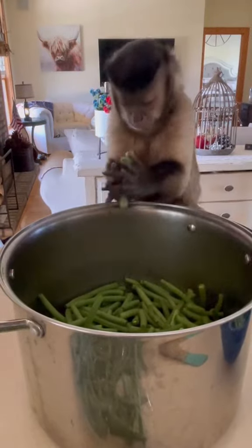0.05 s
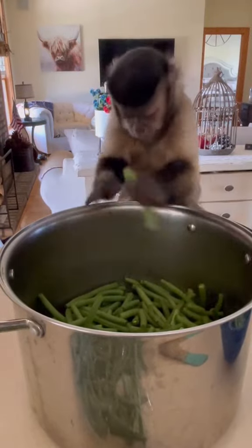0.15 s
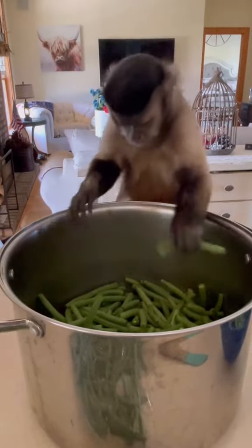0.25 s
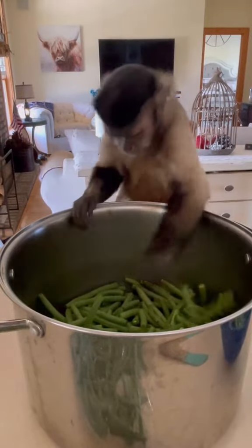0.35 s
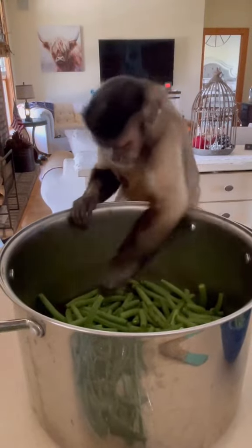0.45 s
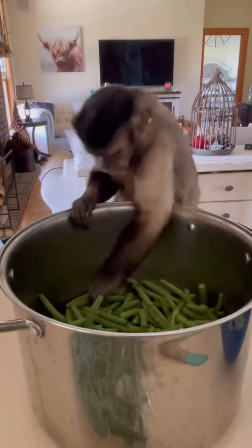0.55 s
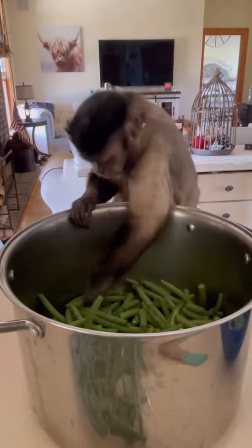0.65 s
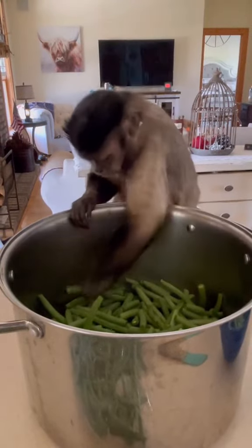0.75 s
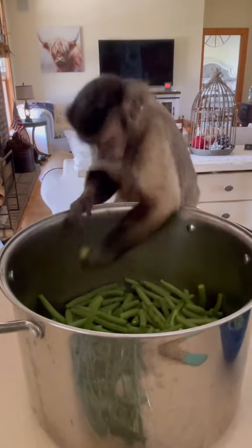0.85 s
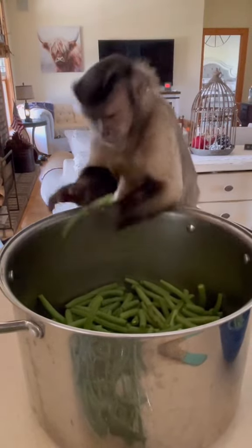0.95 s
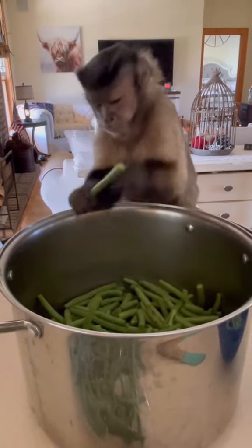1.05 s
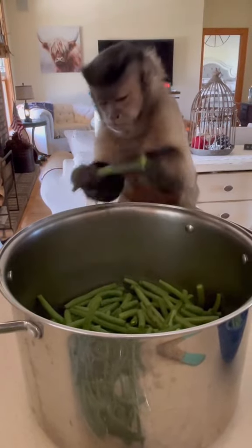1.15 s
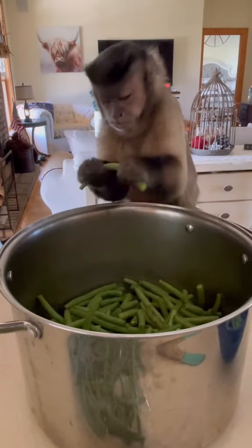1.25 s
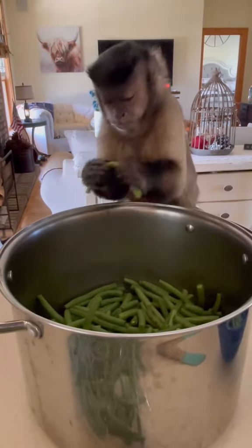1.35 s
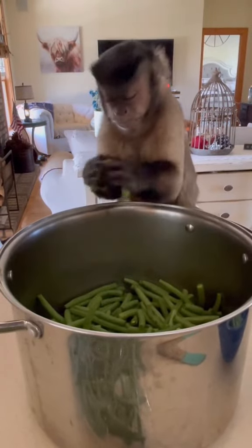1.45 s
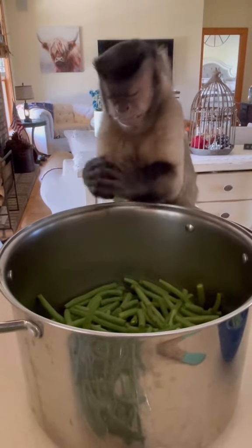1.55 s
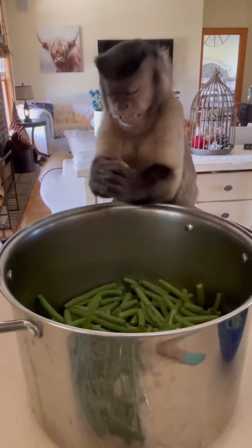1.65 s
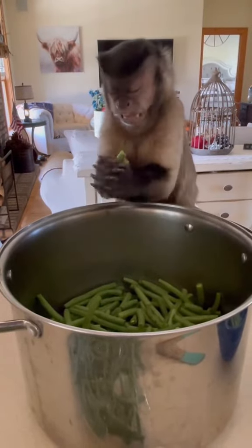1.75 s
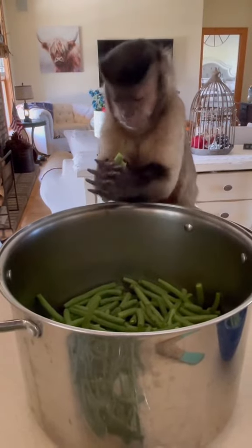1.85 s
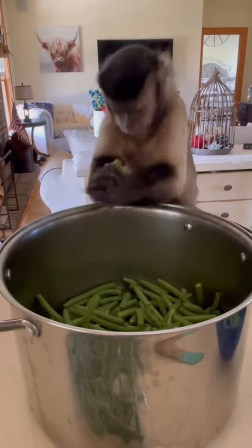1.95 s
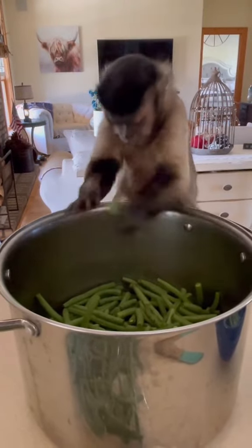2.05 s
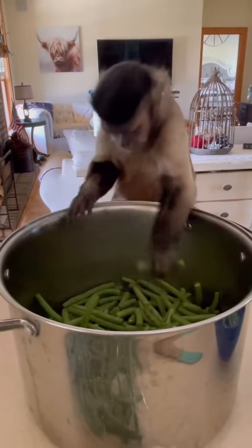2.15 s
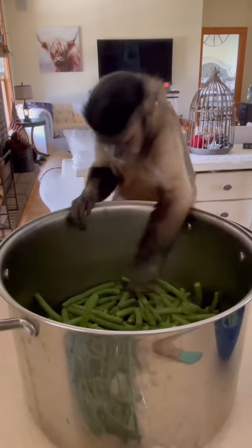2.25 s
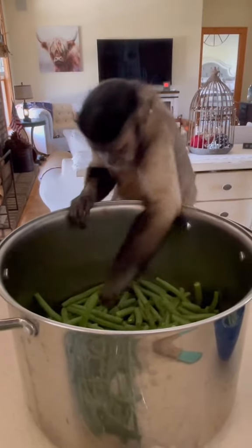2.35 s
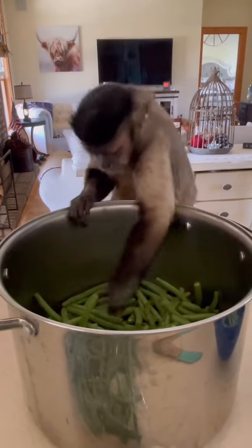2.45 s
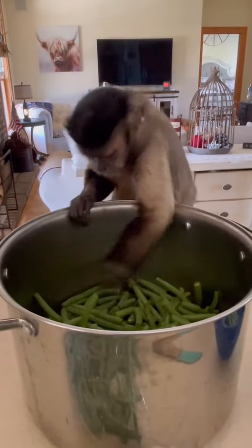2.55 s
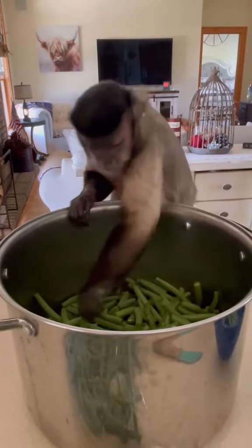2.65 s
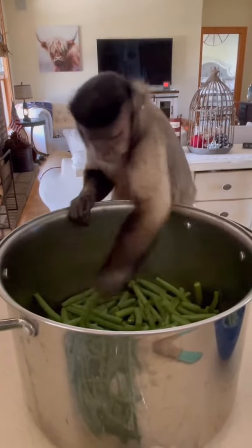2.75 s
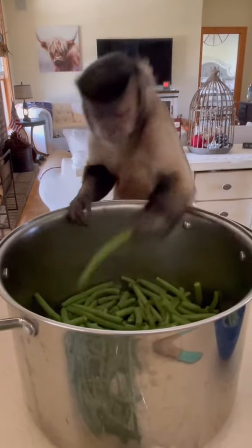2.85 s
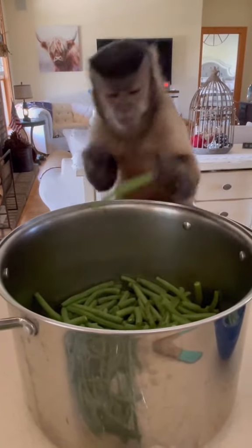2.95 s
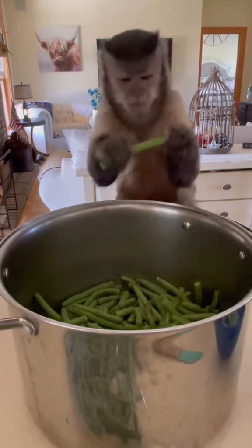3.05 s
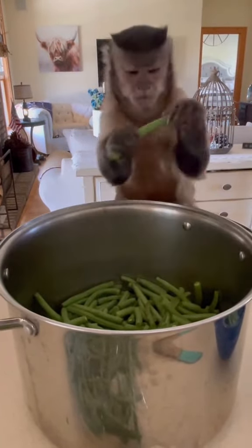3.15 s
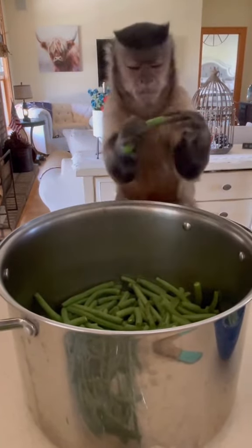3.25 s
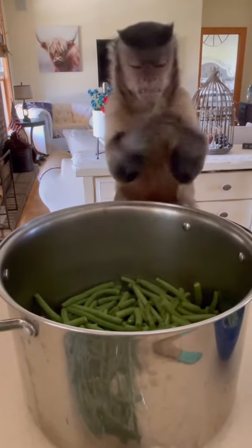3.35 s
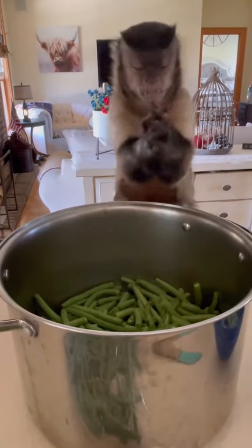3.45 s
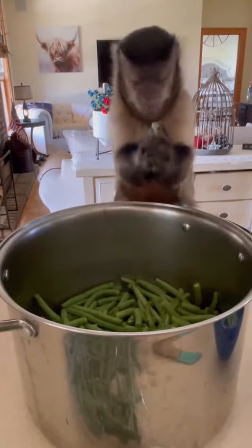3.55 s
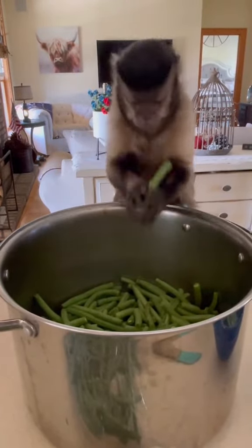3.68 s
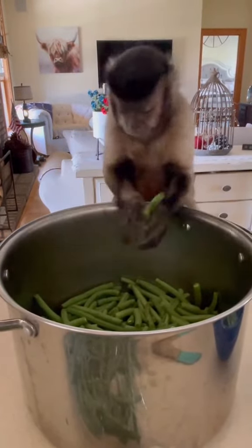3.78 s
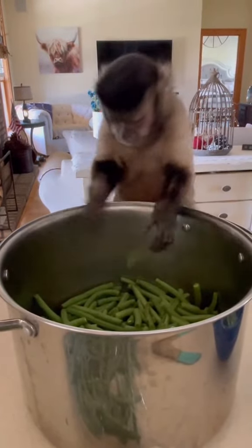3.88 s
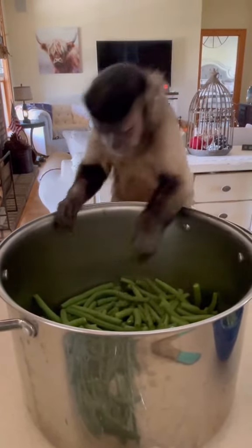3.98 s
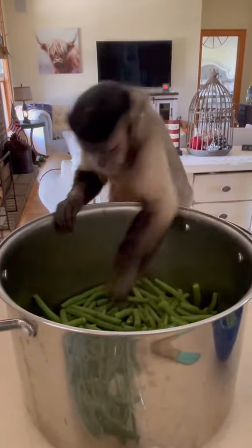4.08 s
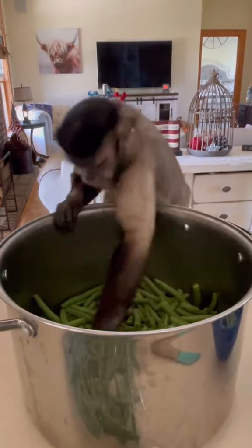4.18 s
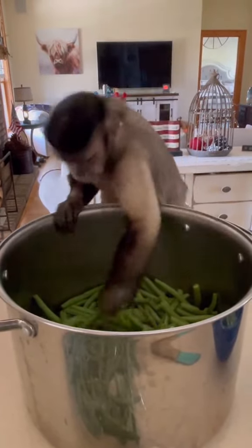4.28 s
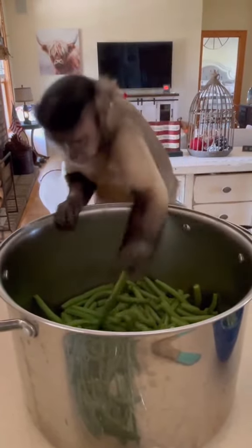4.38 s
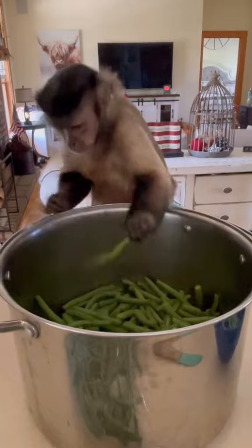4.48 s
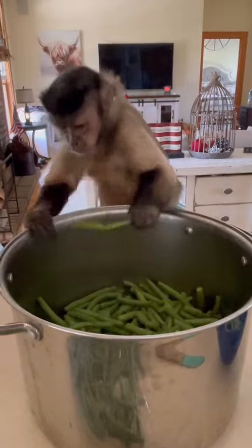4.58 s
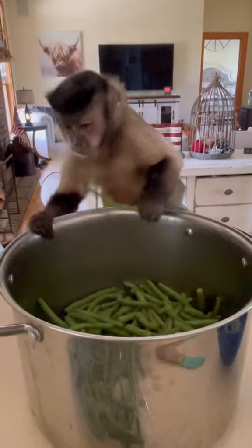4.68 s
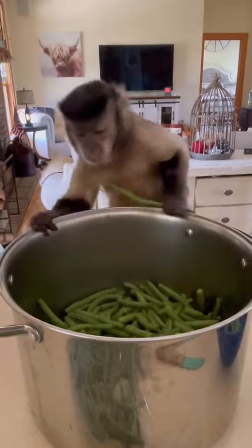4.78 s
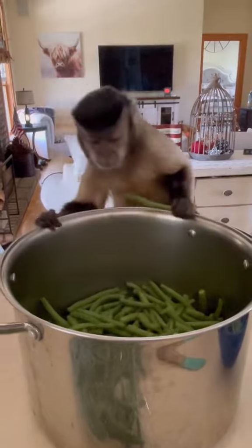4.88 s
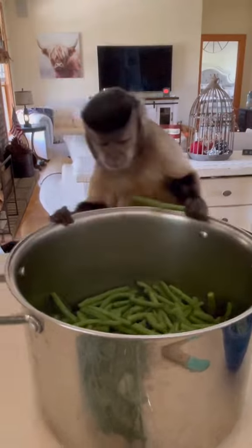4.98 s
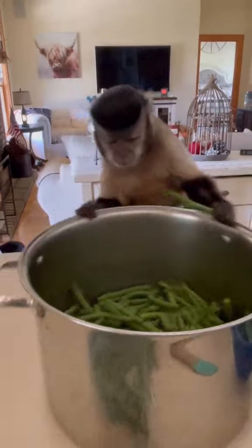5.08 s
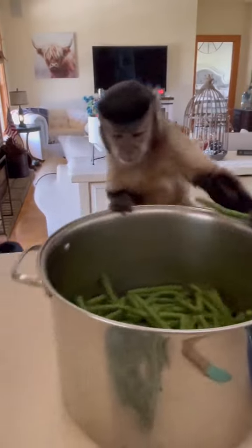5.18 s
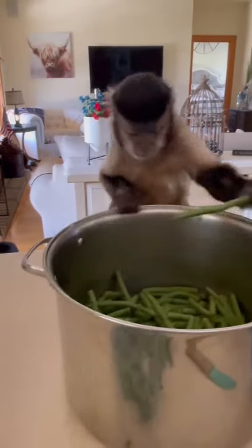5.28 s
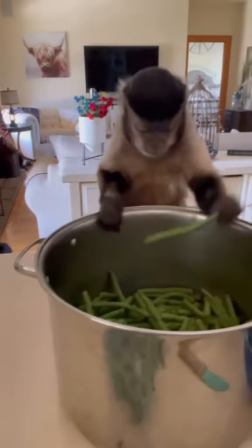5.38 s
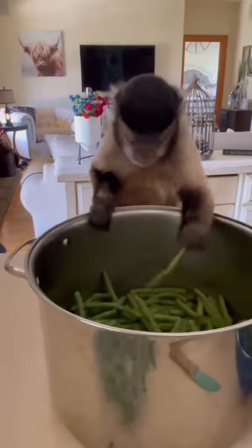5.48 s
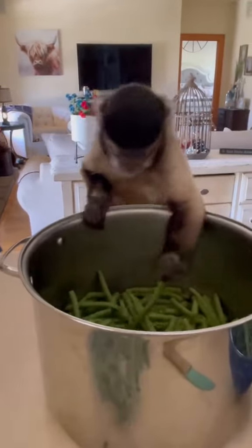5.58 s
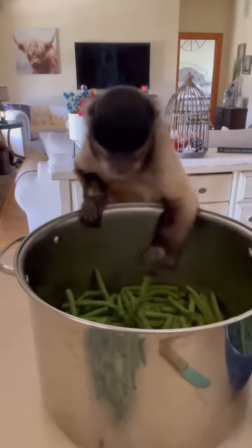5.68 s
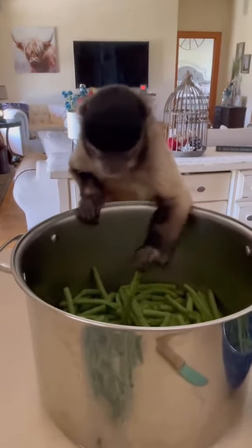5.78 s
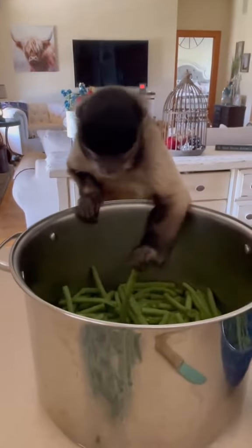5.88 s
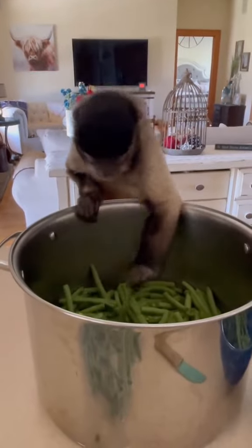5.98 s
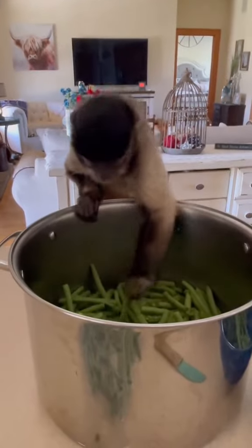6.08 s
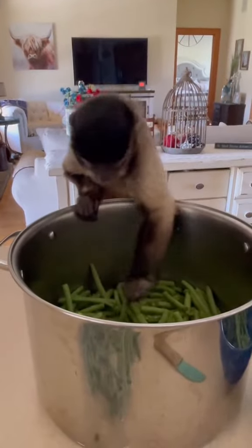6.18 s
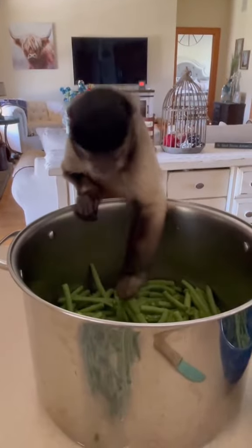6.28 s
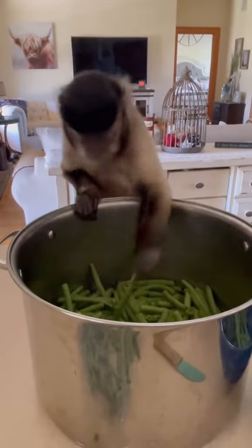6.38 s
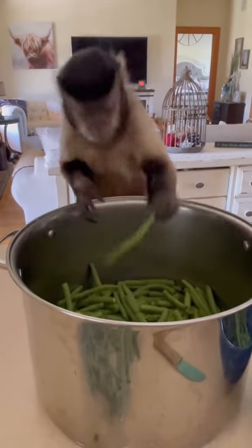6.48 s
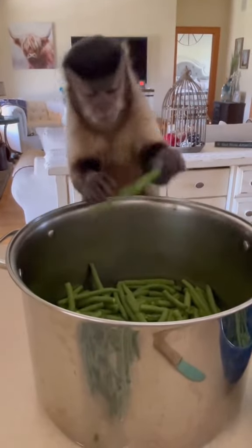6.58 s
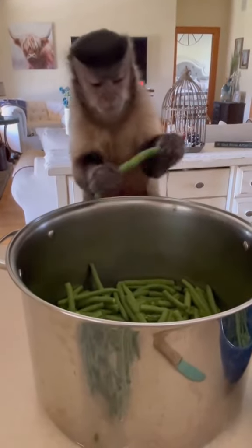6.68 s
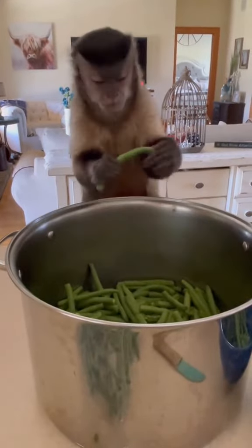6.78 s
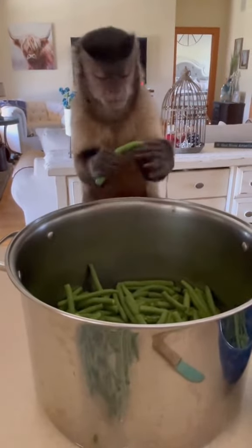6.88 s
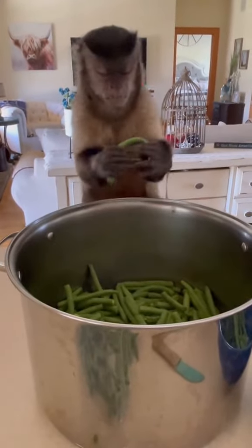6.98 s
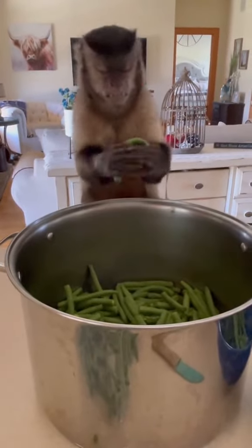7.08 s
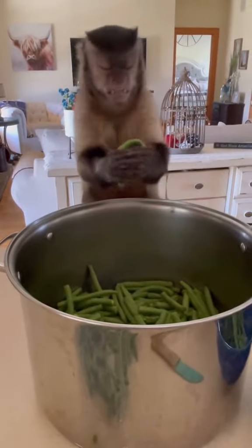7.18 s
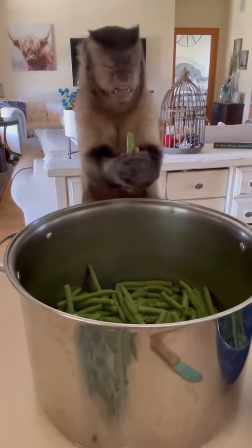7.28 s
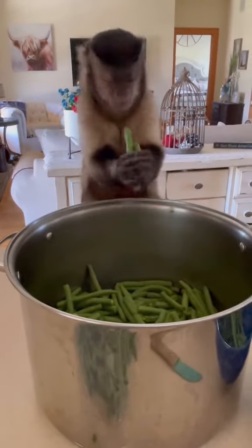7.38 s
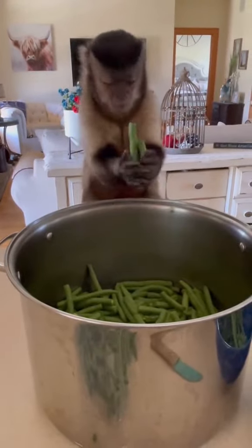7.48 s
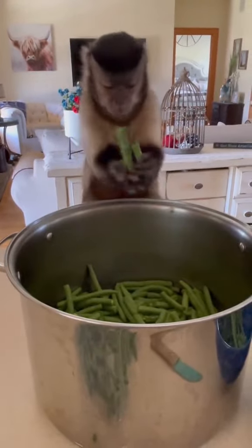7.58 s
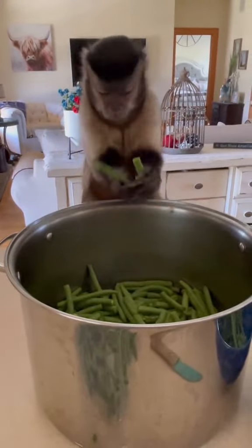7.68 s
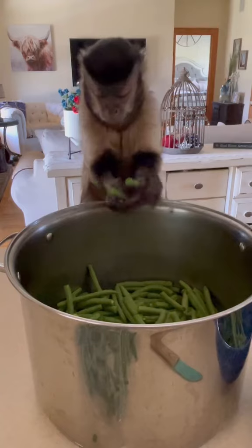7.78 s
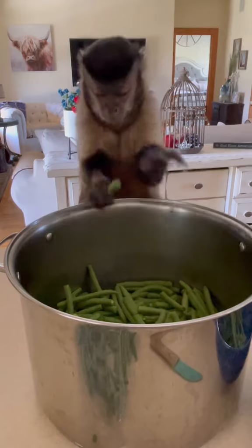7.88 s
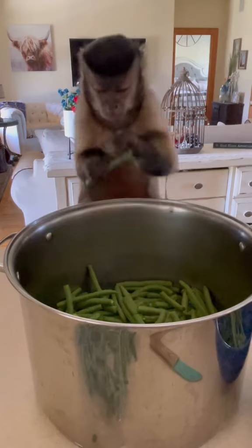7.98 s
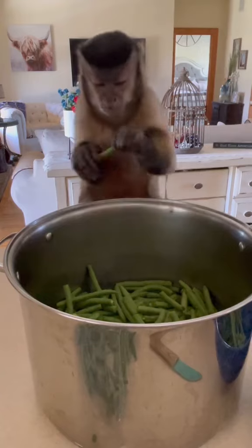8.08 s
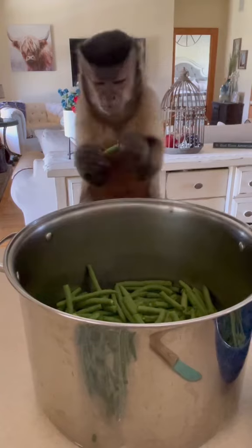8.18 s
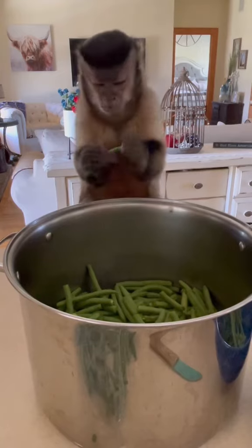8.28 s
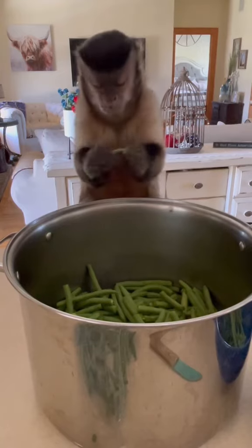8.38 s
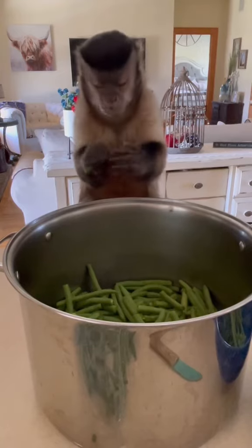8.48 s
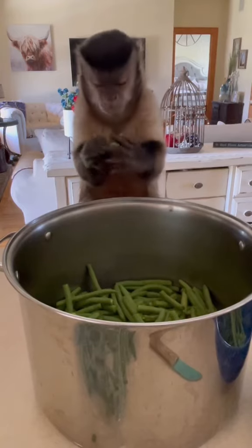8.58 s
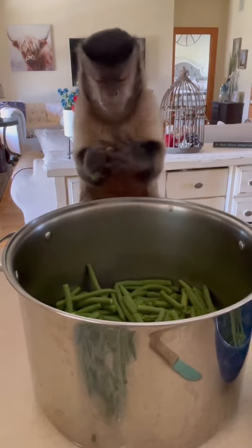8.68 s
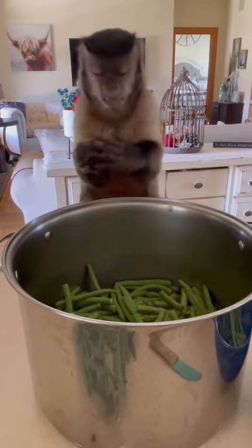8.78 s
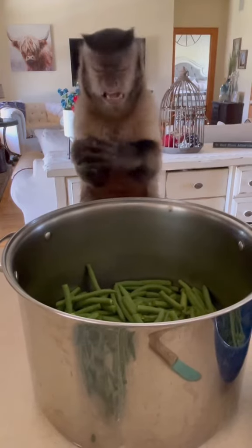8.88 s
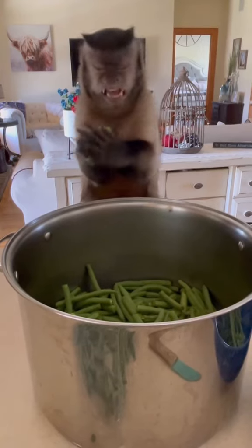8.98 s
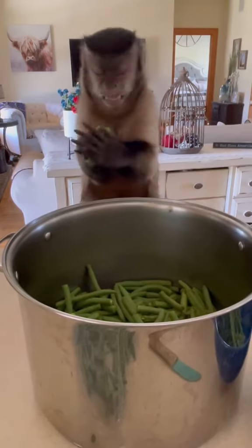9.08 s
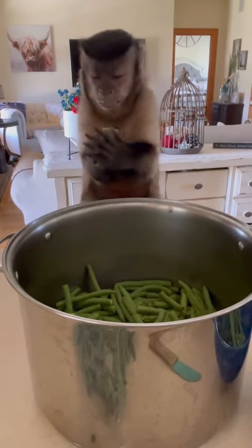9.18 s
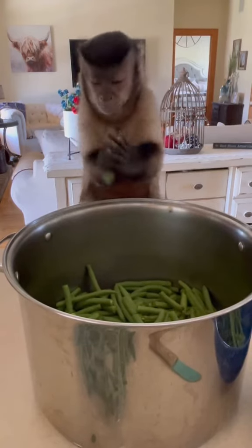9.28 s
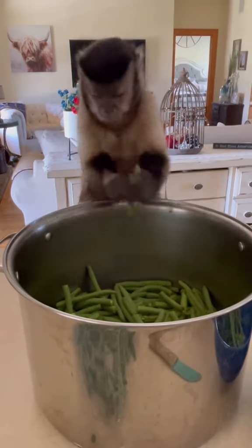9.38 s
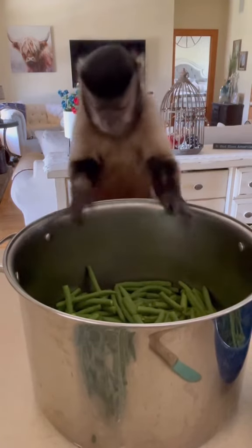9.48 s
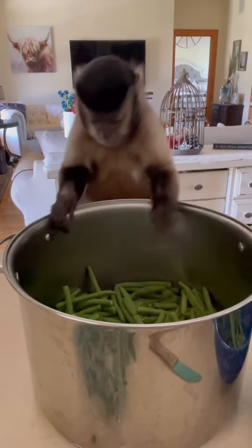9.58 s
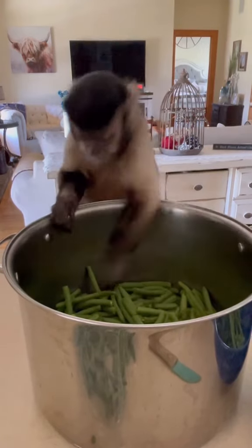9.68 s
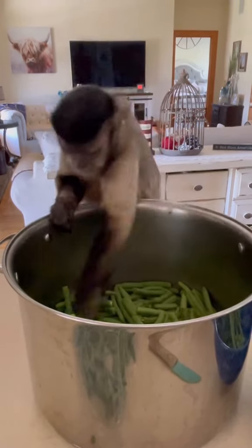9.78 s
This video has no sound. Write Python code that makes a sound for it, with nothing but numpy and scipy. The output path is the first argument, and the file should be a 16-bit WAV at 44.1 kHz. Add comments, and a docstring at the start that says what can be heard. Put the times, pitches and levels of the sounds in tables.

```python
"""Close stereo microphone at a kitchen counter, over a low throbbing appliance hum and soft ventilation air.
A small monkey rummages in green beans over a steel stockpot, bumps the rim and snaps two pods (noise bursts
through pod resonances; steel modes). It squeaks twice (unsteady harmonics), then the pot scrapes along the
counter (coloured grit noise) and bangs down, rocking (steel and counter modes, falling bumps).
More handling and bumps follow, with two further snaps, in a small diffuse room."""
import sys
import numpy as np
from scipy import signal
from scipy.io import wavfile
from scipy.ndimage import uniform_filter1d

SR = 44100
rng = np.random.default_rng(int(sys.argv[2]) if len(sys.argv) > 2 else 0)


def master_out(mix):
    """Clip the mix to full scale and print it as 16-bit PCM to the path in sys.argv[1]."""
    frames = np.transpose(np.atleast_2d(mix))
    ceiling = np.clip(frames, -1, 1)
    pcm = np.round(ceiling * 32767).astype(np.int16)
    wavfile.write(sys.argv[1], SR, pcm)


N = 433944  # length in samples

# Pods snapped in two. Each row: break of the flesh in seconds, level in dB, decay constant of the tear
# in seconds, pod resonance in Hz, how much earlier the outer skin splits in seconds.
SNAPS = [(1.6831, -33.5, 0.0012, 2730, 0.0013), (3.326, -45, 0.0012, 1120, 0.0013),
         (7.2389, -36, 0.0023, 2920, .0022), (8.9371, -36, 0.0022, 2530, 0.0041)]
# Small single cracks and ticks. Each row: start in seconds, level in dB, decay constant of the burst
# in seconds, resonance in Hz.
CRACKS = [(1.653, -53, 0.0059, 2590), (2.164, -60.5, 0.0022, 5000), (3.935, -56, 0.0017, 4500),
          (6.9751, -56, 0.0018, 6360), (7.098, -65, .002, 10500), (7.1225, -57, 0.012, 10400),
          (8.193, -73.5, 0.0012, 4560)]
# Spectrum of a tearing pod. Each row: frequency in Hz, level in dB.
POD_SPECTRUM = [(100, -14.5), (400, -4), (900, -3.5), (1500, -9.5), (2700, -5), (4500, -4.5), (7000, 0),
                (11000, 2.5), (13000, -5.5), (16000, -19)]
# Hands landing on the rim. Each row: start in seconds, ring in dB, hardness as a corner in Hz, counter thud
# in dB, brush of skin in dB, low and high frequency in Hz that this spot of the wall favours.
KNOCKS = [(0.3524, -46, 1120, -47.5, -68.5, 447, 1180), (.617, -63.5, 1500, -72, -77, 745, 1170),
          (2.0801, -50, 2100, -48.5, -84, 630, 3750), (2.1628, -54.5, 1400, -64, -74, 633, 2620),
          (2.207, -61, 1280, -52.5, -80, 1160, 2100), (3.919, -51, 2300, -55, -66, 745, 1170),
          (5.573, -62, 702, -56, -73, 453, 1925), (5.7663, -58.5, 710, -51, -71.5, 299, 1896),
          (5.902, -59, 1240, -52.5, -67.5, 827, 1850), (6.0432, -65.5, 800, -49.5, -76.5, 720, 1180),
          (7.965, -50.5, 1490, -63, -78, 735, 2550), (7.978, -52, 1670, -62, -85, 1051, 2552),
          (9.487, -59, 1700, -53.5, -77, 1580, 3180), (9.616, -58.5, 2420, -56.5, -72, 736, 2340)]
# Pot modes ahead of scatter and of the spot struck. Each row: frequency in Hz, level in dB struck at the
# rim, level in dB struck at the base.
POT_MODES = [(287, -9, -4), (301, -2, -12), (332, -9, -4), (452, -2, -7), (586, -11, -13), (632, -9, -19),
             (745, -2, -12), (872, -12, -11), (960, -8, -12), (1163, -5, 1), (1300, -8, -1),
             (1580, -10, -14), (1674, -10, -13), (1880, -12, -3), (1910, -9, -4), (2025, -14, -4),
             (2066, -14, -2), (2318, -12, -4), (2402, -12, -5), (2545, -8, -8), (2676, -13, 1),
             (2810, -10, -16), (3049, -9, -2), (3103, -10, 2), (3270, -8, -3), (3537, -14, 0),
             (3713, -14, -2), (3975, -10, -6), (4380, -15, -3), (5615, -18, -5), (6810, -20, -5)]
# The pot's base slamming and rocking. Each row: start in seconds, ring in dB, hardness as a corner in Hz,
# counter thud in dB, contact clack in dB.
SLAMS = [(5.1737, -20.5, 7040, -29.5, -15.5), (5.1785, -22, 3007, -21, -26),
         (5.203, -31, 4974, -38.5, -32.5), (5.226, -30.5, 3970, -30, -28.5),
         (5.256, -32, 3000, -36.5, -32.5), (5.277, -36, 1206, -34, -43)]
# Modes of the counter under the pot. Each row: frequency in Hz, level in dB, 60 dB decay in seconds.
COUNTER_MODES = [(85, -6, 0.18), (100, -4, 0.21), (165, 3, 0.061), (205.9, -3.5, 0.13)]
# Spectrum of the contact clack. Each row: frequency in Hz, level in dB.
CLACK_SPECTRUM = [(100, -14.5), (600, -12), (1600, -7), (2700, -2.5), (3400, -2), (4500, -3), (7000, -5),
                  (11000, -7), (12800, -14.5), (14000, -39)]
# Hollow bumps on the counter top. Each row: start in seconds, level in dB.
BUMPS = [(5.0591, -35.5), (5.1805, -22), (5.236, -31), (5.2732, -21), (5.284, -24.5), (5.314, -33)]
# Spectrum of grit under the base. Each row: frequency in Hz, level in dB.
SCRAPE_SPECTRUM = [(80, 2), (550, -3.5), (1400, -0.5), (2300, -2.5), (3300, 1), (4600, -0.5), (6300, 1.5),
                   (8000, -3), (11000, -5.5), (12800, -14), (13800, -41)]
# Resonances that the scraping base sings with. Each row: frequency in Hz, width in Hz, level in dB.
SQUEAL_MODES = [(767.6, 78, -3.5), (2636, 240, -1), (3820, 68, 6), (5677, 350, 1.5), (6900, 110, -3),
                (11400, 770, -1.5)]
# Monkey squeaks. Each row: start in seconds, length in seconds, attack in seconds, level in dB, pitch in Hz,
# share of the pitch it scoops up from, swell in dB.
SQUEAKS = [(4.502, .039, 0.007, -34, 645, .04, 2), (4.7108, .035, .002, -36, 784, .005, 4.5)]
# Spectrum of the monkey's throat. Each row: frequency in Hz, level in dB.
THROAT_SPECTRUM = [(630, -1.5), (800, -5), (1250, -8.5), (1560, -3.5), (1900, -1.5), (2500, -2), (3150, 1),
                   (3800, -15), (4500, -34), (5550, -13.5), (6500, -34.5), (8000, -33), (10000, -56)]
# A pod dragged over the others. Each row: loudest moment in seconds, level in dB ahead of the steel's ring,
# half length of the fall in seconds, centre in Hz.
DRAGS = [(0.132, -85, 0.13, 3680), (0.794, -81.5, 0.14, 3500), (0.866, -64, 0.021, 3700),
         (2.862, -56.5, 0.023, 3800), (3.063, -82, 0.041, 3600), (3.745, -75, 0.051, 3550),
         (4.456, -67, 0.048, 4000), (6.440, -61.5, 0.034, 4000), (6.55, -82, .05, 2304)]
# Steel resonances that a dragged pod excites. Each row: frequency in Hz, width in Hz, level in dB.
DRAG_RING = [(2580, 25, 12), (3135, 22, 17), (3400, 50, 7), (3875, 20, 15), (4480, 45, 10), (5040, 35, 10),
             (5940, 35, 11)]
# Fingers sliding along a pod. Each row: loudest moment in seconds, level in dB, half length in seconds.
STROKES = [(1.641, -61, 0.016), (2.324, -66.5, 0.011), (7.212, -70, 0.024), (8.503, -67, 0.014),
           (9.82, -72.5, .029)]
# The hand groping among beans. Each row: middle in seconds, level in dB, half length in seconds.
GROPES = [(.51, -74, 0.041), (1.17, -77, 0.048), (4.25, -79, 0.12), (6.333, -77.5, 0.046),
          (8.52, -69, 0.043)]
# Spectrum of the ventilation air. Each row: frequency in Hz, level in dB.
AIR_SPECTRUM = [(20, -20.5), (35, -10), (60, 0), (150, 1), (300, -6), (500, -16), (800, -26), (1500, -32.5),
                (4000, -36), (8000, -40), (11000, -37.5), (13000, -47), (16000, -46.5)]
# Motor lines of the hum. Each row: frequency in Hz, rms level in dB.
HUM_LINES = [(42.4, -76), (51.0, -65), (59.5, -75), (119.7, -77)]
# Decay of the room. Each row: frequency in Hz, 60 dB decay in seconds.
ROOM_DECAY = [(100, 0.55), (400, 0.52), (1500, .58), (3000, .5), (6000, 0.36), (12000, 0.24)]
# Response of the microphone port. Each row: frequency in Hz, level in dB.
MICROPHONE = [(20, -0.5), (8400, -3), (9050, -13.5), (10000, -0.5), (16000, -6.5)]

# Snap: skin splits, flesh breaks, then the seam string lets go (dB against the flesh; lag in s)
SKIN_DB, STRING_DB, STRING_LAG_S = -1.5, -7, 0.0042
# Pod: resonance sharpness; second resonance as a ratio to the first, and its level against it
POD_Q, POD_OVERTONE, POD_OVERTONE_DB = 2.5, 2.08, -6.5
# Fingers slip at each crack or tick: level against it, half length
SLIP_DB, SLIP_S = -16, 0.017
# Pot: 60 dB decay struck at rim and base (s), share of a rim knock that reaches the room
RIM_T60_S, BASE_T60_S, RIM_ROOM_DB = .13, .15, -12
SLAM_RISE_S = .0005  # time constant of a slam's build-up
# A hand settles with a second contact, softer (dB) and less hard (ratio), while its skin brushes the steel
SETTLE_S, SETTLE_DB, SETTLE_HARDNESS, BRUSH_LAG_S, BRUSH_S = 0.018, -6, 0.93, 0.0072, 0.029
# Harder contacts clack more: level against the ring at a hardness of 1 kHz, and its growth
CLACK_DB, CLACK_DB_PER_OCTAVE = -18, 7
# How much the struck spot favours its modes, and over what spread
SPOT_DB, SPOT_OCTAVES = 8, .15
# The pot is pulled from rest with even acceleration, then braked; level follows a power of its speed
SLIDE_START_S, SLIDE_STOP_S, SLIDE_BRAKE_S, SLIDE_DB, SLIDE_SPEED_POWER = 4.765, 5.165, .02, -37.5, 1.1
SLIDE_DULL_HZ = 3500  # corner of the scrape as the pot starts to move
COUNTER_LOW_HZ = 62  # the counter radiates little below this
# Squeak endings: share of the pitch lost, how late pitch and level give way, roughness at the end
SAG, SAG_POWER, RELEASE_POWER, END_ROUGH = .21, 4.5, 8.0, .3
# Colour of each kind of rubbing: centre in Hz, spread in octaves
FINGER_BAND, BRUSH_BAND, GROPE_BAND = (10300, .3), (6300, 1.0), (1900, 1.5)
DRAG_CATCH = 1.75  # a dragged pod's rise is this many times quicker than its fall
# Harder drags ring the steel more: drag level at which the ring table holds, dB gained per dB
DRAG_RING_AT_DB, DRAG_RING_GROWTH = -56.0, 0.3
TREBLE_TOP_HZ = 13030  # treble corner of the rubbing and cap on the pod's second resonance
EDGE_HZ = 15900  # upper band limit


def amp(db):
    """Decibels to gain."""
    return 10 ** (np.asarray(db) / 20)


def evened(x):
    """Scales to rms 1."""
    return x / np.sqrt(np.mean(x ** 2) + 1e-20)


def peaked(x, size=220):
    """Scales so that the loudest few milliseconds have rms 1."""
    return x / np.sqrt(uniform_filter1d(x ** 2, size).max() + 1e-20)


def read(points, hz):
    """Reads a spectrum on a log-frequency axis."""
    f, value = np.transpose(points)
    return np.interp(np.log(hz + 1), np.log(f), value)


def add(mix, s, sound):
    """Adds a sound into the stereo mix at time s."""
    part = mix[:, max(round(s * SR), 0):][:, :sound.shape[-1]]
    part += sound[..., :part.shape[-1]]


def colour(x, points, size=4096):
    """Causal minimum-phase filter with the given spectrum, so attacks stay sharp."""
    log_gain = np.log(amp(read(points, abs(np.fft.fftfreq(size, 1 / SR)))))
    taps = np.fft.ifft(np.exp(np.conj(signal.hilbert(log_gain)))).real[:size // 2]
    return signal.oaconvolve(x, taps[None], axes=1)[:, :x.shape[1]]


def resonate(x, hz, q):
    """Lets one resonance of sharpness q ring."""
    return signal.lfilter(*signal.iirpeak(hz, q, fs=SR), x)


def one_pole_low(x, hz):
    """Dulls a sound gently above a corner."""
    return signal.lfilter(*signal.butter(1, hz, fs=SR), x)


def grains(size, spread_db, width):
    """Stereo train of tiny slips of uneven size; width is the part that the two ports do not share."""
    mid, side, strength = rng.standard_normal((3, size))
    return amp(spread_db * strength) * np.array([mid + width * side, mid - width * side])


def fractures():
    """Three bursts to a snap, one to a crack or tick: (s, dB, decay s, Hz)."""
    rows = list(CRACKS)
    for s, db, decay, hz, lead in SNAPS:
        rows.append((s - lead, db + SKIN_DB, decay, hz))
        rows.append((s, db, decay, hz))
        rows.append((s + STRING_LAG_S, db + STRING_DB, decay, hz))
    return rows


def snaps(pod_ring=6.5, spread_db=2.0, width=0.034, rise=0.00017):
    """A pod breaks as a short avalanche of bursting cells that rings the hollow pod."""
    out, t = np.zeros((2, N)), np.arange(4096) / SR
    for s, db, decay, hz in fractures():
        burst = grains(len(t), spread_db, width) * np.exp(-t / decay) * (1 - np.exp(-t / rise))
        tear = colour(burst, POD_SPECTRUM)
        low = resonate(tear, hz, POD_Q)
        high = resonate(tear, min(hz * POD_OVERTONE, TREBLE_TOP_HZ), POD_Q)
        add(out, s, amp(db) * peaked(tear + pod_ring * (low + amp(POD_OVERTONE_DB) * high)))
    return out


def landings():
    """A hand lands on the rim and settles: (s, ring dB, hardness Hz, thud dB, clack dB, dB of each mode)."""
    rows, (mode_hz, rim_db, _) = [], np.transpose(POT_MODES)
    for s, ring_db, hard_hz, thud_db, _, *spot_hz in KNOCKS:
        favour = sum(np.exp(-.5 * (np.log2(mode_hz / hz) / SPOT_OCTAVES) ** 2) for hz in spot_hz)
        mode_db = rim_db + SPOT_DB * favour
        clack_db = ring_db + CLACK_DB + CLACK_DB_PER_OCTAVE * np.log2(hard_hz / 1000)
        rows.append((s, ring_db, hard_hz, thud_db, clack_db, mode_db))
        rows.append((s + SETTLE_S, ring_db + SETTLE_DB, hard_hz * SETTLE_HARDNESS,
                     thud_db + SETTLE_DB, clack_db + SETTLE_DB, mode_db))
    return rows


def pot_ring(mode_db, hard_hz, t60, scatter_db=0.95, width=0.1, count=3):
    """The pot's modes after one blow, damped by the beans; a soft blow favours the low ones."""
    t = np.arange(SR // 4) / SR
    place, lag, split, late = rng.standard_normal((4, count * len(POT_MODES), 1))
    # the uneven load of beans splits each mode into close neighbours that beat
    hz = np.repeat(np.transpose(POT_MODES)[0], count)[:, None] * (1 + .008 * split)
    db = np.repeat(mode_db, count)[:, None] + scatter_db * place
    decay = amp(db - 60 * t / t60) / (1 + (hz / hard_hz) ** 2)
    phase = late * hz / 1500  # long waves start together, short ones scatter
    lag = lag * width * hz / (hz + 3000)  # short waves reach the two ports out of step
    return np.array([(decay * np.sin(2 * np.pi * hz * t + phase + side * lag)).sum(0) for side in (-1, 1)])


def counter_thud(t, thud_hz):
    """The counter's modes swing after a blow, weaker above the corner thud_hz."""
    thud = 0
    for k, (hz, db, t60) in enumerate(COUNTER_MODES):
        decay = amp(db - 60 * t / t60) / (1 + (hz / thud_hz) ** 2)
        thud = thud + (-1) ** k * decay * np.sin(2 * np.pi * hz * t)
    return thud


def knocks(blows, ring_t60, clack_decay, clack_hz, rise, thud_hz, clack_width=0.15, clack_spread_db=5.5):
    """Each blow clacks at the contact, rings the steel and thuds into the counter."""
    out, t = np.zeros((2, N)), np.arange(SR // 4) / SR
    thud = counter_thud(t, thud_hz)
    press = 1 - np.exp(-t / rise)  # the contact force builds up
    for s, ring_db, hard_hz, thud_db, clack_db, mode_db in blows:
        burst = grains(len(t), clack_spread_db, clack_width) * press * np.exp(-t / clack_decay)
        clack = one_pole_low(colour(burst, CLACK_SPECTRUM), min(clack_hz, SR / 2.2))
        add(out, s, amp(ring_db) * peaked(press * pot_ring(mode_db, hard_hz, ring_t60)))
        add(out, s, amp(thud_db) * peaked(press * thud))
        add(out, s, amp(clack_db) * peaked(clack))
    return out


def wall_boom(s=2.081, db=-38.5, hz=301, t60=0.22, rise=0.0016):
    """A soft palm on the pot's side swings only one low mode of the wall."""
    out, t = np.zeros((2, N)), np.arange(SR // 4) / SR
    swing = amp(-60 * t / t60) * np.sin(2 * np.pi * hz * t)
    add(out, s, amp(db) * peaked((1 - np.exp(-t / rise)) * swing))
    return out


def slide(spread_db=4.0, width=0.24, judder_db=1.5):
    """Grit under the pot's base hisses louder and brighter as it gains speed, and makes the steel sing."""
    out, t = np.zeros((2, N)), np.arange(SLIDE_START_S, SLIDE_STOP_S + SLIDE_BRAKE_S, 1 / SR)
    speed = np.interp(t, [SLIDE_START_S, SLIDE_STOP_S, SLIDE_STOP_S + SLIDE_BRAKE_S], [0, 1, 0])
    judder = amp(judder_db * evened(uniform_filter1d(rng.standard_normal(len(t)), size=300)))
    grit = colour(grains(len(t), spread_db, width) * judder, SCRAPE_SPECTRUM)
    dull = one_pole_low(grit, SLIDE_DULL_HZ)
    grit = dull + np.sqrt(speed) * (grit - dull)
    sing = sum(amp(peak_db) * resonate(grit, hz, hz / wide) for hz, wide, peak_db in SQUEAL_MODES)
    add(out, SLIDE_START_S, amp(SLIDE_DB) * speed ** SLIDE_SPEED_POWER * evened(grit + sing))
    return out


def bumps(start_hz=1100, end_hz=250, glide=.003, decay=0.011, scatter=0.71, scatter_hz=1500):
    """Bending waves in the counter top arrive treble first, so each bump falls in pitch."""
    out, t = np.zeros((2, N)), np.arange(SR // 8) / SR
    hz = end_hz + (start_hz - end_hz) * np.exp(-t / glide)
    wave = np.sin(2 * np.pi * np.cumsum(hz) / SR)
    for s, db in BUMPS:
        echoes = evened(signal.lfilter(*signal.butter(2, scatter_hz, fs=SR), grains(len(t), 0, 0.069)))
        add(out, s, amp(db) * peaked((wave + scatter * echoes) * np.exp(-t / decay)))
    return out


def squeaks(jitter=.01, rasp=.04, flutter_db=1.8):
    """Two short monkey calls whose pitch scoops up, then drops and roughens as they end."""
    out = np.zeros((2, N))
    for s, length, attack, db, pitch, scoop, swell_db in SQUEAKS:
        t = np.arange(0, length, 1 / SR)
        drift = uniform_filter1d(rng.standard_normal((17, len(t))), size=120)
        waver, shimmer, *flutter = evened(uniform_filter1d(drift, size=60))
        slack = (t / length) ** SAG_POWER
        arch = 1 - scoop * (1 - t / length) ** 2 - SAG * slack
        hz = pitch * arch * (1 + jitter * (.5 + 2 * slack) * waver)
        turns = np.cumsum(hz) / SR
        call = 0
        for k in range(1, 16):
            level = amp(read(THROAT_SPECTRUM, k * hz) + flutter_db * flutter[k - 1])
            call = call + level * np.cos(2 * np.pi * k * turns + k * k / 2)
        noise = colour(grains(len(t), 0, 0), THROAT_SPECTRUM)
        swell = amp(swell_db * (t / length - .5))
        effort = np.minimum(t / attack, 1) * swell * (1 - (t / length) ** RELEASE_POWER)
        rough = END_ROUGH * slack
        voice = evened(call) * (1 + rough * shimmer) + (rasp + rough) * evened(noise)
        add(out, s, amp(db) * effort * voice)
    return out


def rustles(rows, shape, rings=(), catch=1, spread_db=6.0, clump_db=2.5, width=0.42, skirt_db=-12.0):
    """Skin and pods rub in clumps of small slips."""
    out, hz = np.zeros((2, N)), np.geomspace(100, SR / 2, num=64)
    t = np.arange(-SR // 5, SR // 5) / SR
    centre_hz, octaves = shape
    hump = np.exp(-.5 * (np.log2(hz / centre_hz) / octaves) ** 2)
    band = (hump + amp(skirt_db)) / (1 + (hz / TREBLE_TOP_HZ) ** 10)
    for s, db, length in rows:
        clumps = amp(clump_db * evened(uniform_filter1d(rng.standard_normal(len(t)), size=130)))
        rub = colour(grains(len(t), spread_db, width) * clumps, np.c_[hz, 20 * np.log10(band)])
        rub = amp(db) * evened(rub) / np.cosh(2 * t * np.where(t < 0, catch, 1) / length)
        steel = sum(amp(peak_db) * resonate(rub, f, f / wide) for f, wide, peak_db in rings)
        rub = rub + amp(DRAG_RING_GROWTH * (db - DRAG_RING_AT_DB)) * steel
        add(out, s + t[0], rub[:, s + t >= 0])  # keep only what falls after the start
    return out


def drags(octaves=0.42):
    """Dragged pods rasp finely and set the steel ringing."""
    return sum(rustles([(s, db, length)], (hz, octaves), DRAG_RING, DRAG_CATCH)
               for s, db, length, hz in DRAGS)


def handling():
    """Pods are groped for and stroked; fingers slip at each crack or tick and brush the rim at each landing."""
    slips = [(s, db + SLIP_DB, SLIP_S) for s, db, _, _ in CRACKS]
    brushes = [(s + BRUSH_LAG_S, db, BRUSH_S) for s, _, _, _, db, _, _ in KNOCKS]
    groping = rustles(GROPES, GROPE_BAND)
    return groping + rustles(STROKES + slips, FINGER_BAND) + rustles(brushes, BRUSH_BAND)


def inside_pot(x, crossing=0.002, bounce=0.33):
    """Sound made in the pot flutters from wall to wall, which gives it a hollow ring."""
    taps = np.zeros(SR // 20)
    taps[np.round(np.arange(8) * crossing * SR).astype(int)] = bounce ** np.arange(8)
    return signal.oaconvolve(x, taps[None] / np.linalg.norm(taps), axes=1)[:, :N]


def nearby(x, decay=0.0072, width=0.29):
    """Quick reflections off the pot and the counter."""
    t = np.arange(SR // 15) / SR
    sparse = rng.random(len(t)) < 3000 / SR
    taps = grains(len(t), 0, width) * sparse * np.exp(-t / decay) * (t > .0015)
    return signal.oaconvolve(x.mean(0)[None], taps / np.linalg.norm(taps[0]), axes=1)[:, :N]


def room(x, gap=.004, mono_hz=900):
    """Dense reflections of random sign, each band dying at its own speed."""
    sparse = rng.random((2, SR)) < 4000 / SR
    taps = rng.choice([-1., 1.], (2, SR)) * sparse * (np.arange(SR) > gap * SR)
    hz, t, z = signal.stft(taps, SR, nperseg=256)
    mid, side = signal.istft(z * amp(-60 * t / read(ROOM_DECAY, hz)[:, None]), SR, nperseg=256)[1]
    side = signal.lfilter(*signal.butter(2, mono_hz, "high", fs=SR), side)  # the ports share the bass
    tail = np.array([mid + side, mid - side]) / np.linalg.norm(mid)
    return signal.fftconvolve(x.mean(0)[None], tail, axes=1)[:, :N]


def background(air_db=-68.0, hum_db=0.0, width=0.36):
    """Soft ventilation rumble, and steady motor lines that throb by beating against each other."""
    t, hum = np.arange(N) / SR, 0
    for hz, db in HUM_LINES:
        hum = hum + amp(db) * np.sqrt(2) * np.sin(2 * np.pi * (hz * t + rng.random()))
    mid, side = colour(rng.standard_normal((2, N)), AIR_SPECTRUM)
    side = width * signal.lfilter(*signal.butter(1, 600, "high", fs=SR), side)  # the bass is shared
    return amp(air_db) * evened(np.array([mid + side, mid - side])) + amp(hum_db) * hum


def scene(snap_room_db=-16.0, snap_near_db=-12.0, pot_room_db=-7.0, bump_room_db=-9.5,
          squeak_room_db=-16.0, squeak_near_db=-13, rustle_room_db=-11.0, count=3):
    """All sources close to the microphone, each with its share of the room."""
    beans = snaps()
    for _ in range(count):  # several independent crackles are summed for an even reverberant tail
        crackle = snaps(pod_ring=0.96)
        beans += amp(snap_near_db) * nearby(crackle) + amp(snap_room_db) * room(crackle)

    rim = knocks(landings(), RIM_T60_S, clack_decay=0.013, clack_hz=2080, rise=0.0013, thud_hz=92)
    base_db = np.transpose(POT_MODES)[2]
    slams = [(*slam, base_db) for slam in SLAMS]
    pot = slide() + knocks(slams, BASE_T60_S, clack_decay=0.012, clack_hz=15070,
                           rise=SLAM_RISE_S, thud_hz=900)
    low_cut = signal.butter(4, COUNTER_LOW_HZ, "high", fs=SR, output="sos")
    pot, thumps = signal.sosfilt(low_cut, [pot, bumps()])

    calls = squeaks()
    calls = calls + amp(squeak_near_db) * nearby(calls)
    rubs = inside_pot(handling()) + drags()

    send = amp(RIM_ROOM_DB) * rim + amp(pot_room_db) * pot + amp(bump_room_db) * thumps
    send = send + amp(squeak_room_db) * calls + amp(rustle_room_db) * rubs
    return beans + rim + pot + wall_boom() + thumps + calls + rubs + room(send) + background()


def record(dry):
    """The microphone port cuts a notch in the treble; then the band limit."""
    edge = signal.firwin(511, EDGE_HZ, window=("kaiser", 9), fs=SR)
    return signal.oaconvolve(colour(dry, MICROPHONE), edge[None], "same")


dry = scene()
out = record(dry)
master_out(out)
```